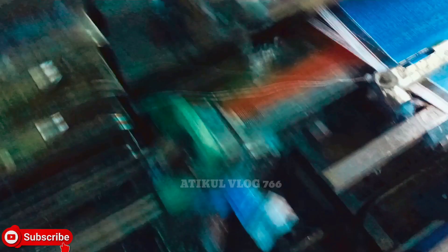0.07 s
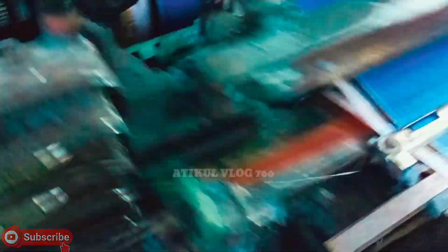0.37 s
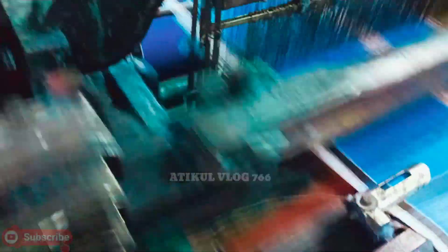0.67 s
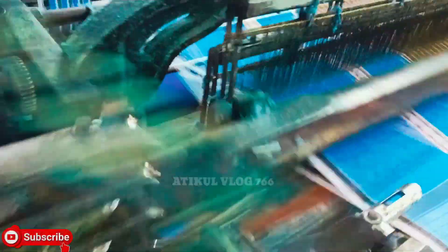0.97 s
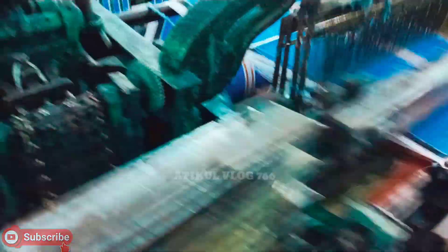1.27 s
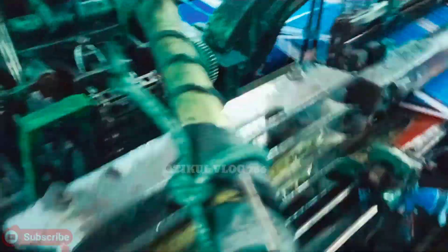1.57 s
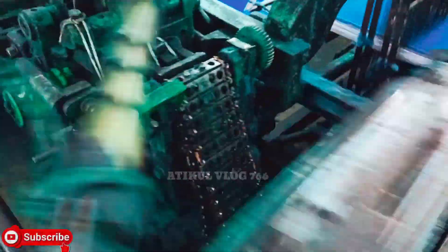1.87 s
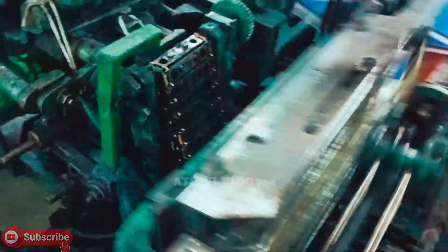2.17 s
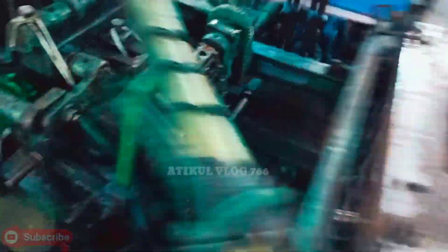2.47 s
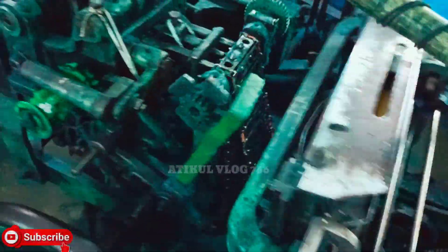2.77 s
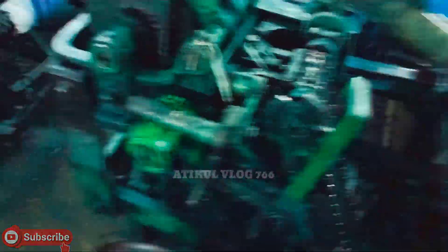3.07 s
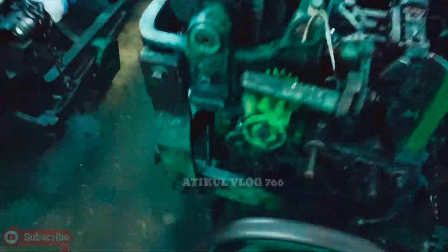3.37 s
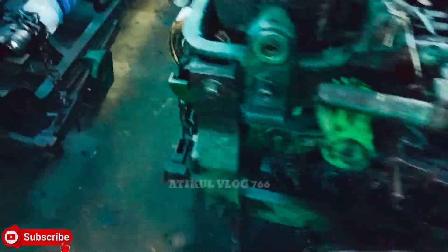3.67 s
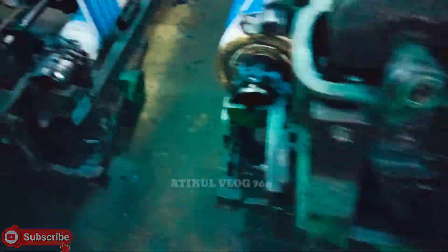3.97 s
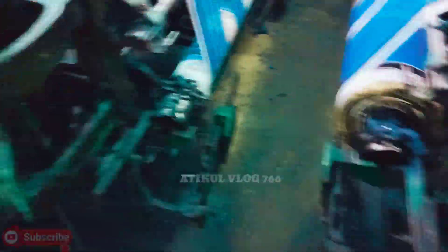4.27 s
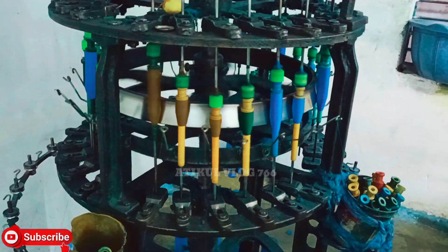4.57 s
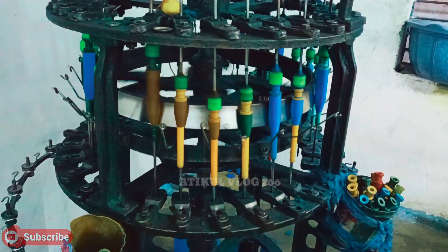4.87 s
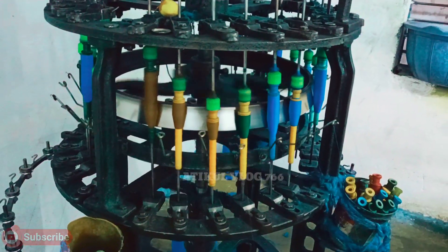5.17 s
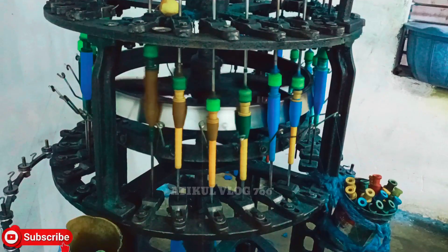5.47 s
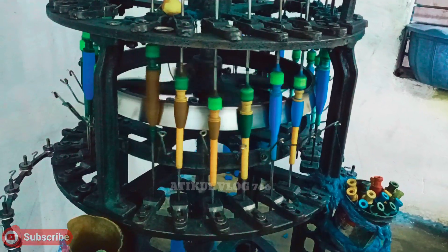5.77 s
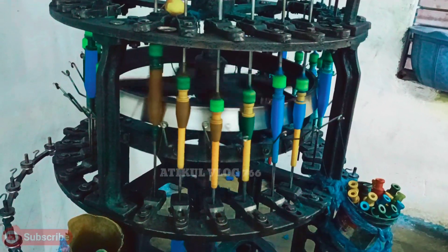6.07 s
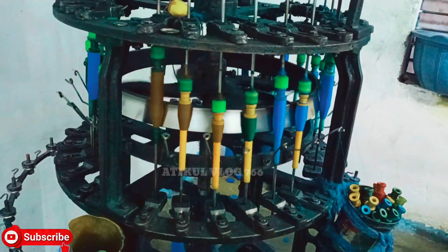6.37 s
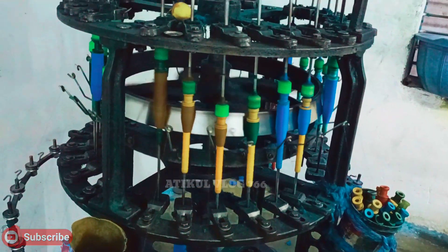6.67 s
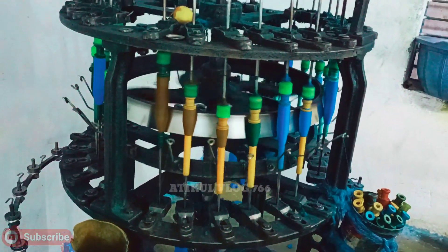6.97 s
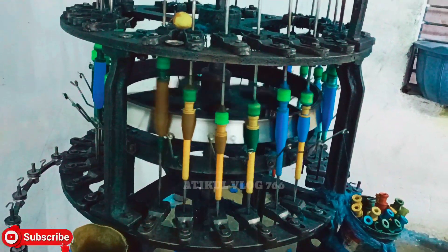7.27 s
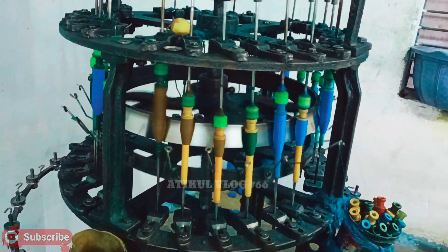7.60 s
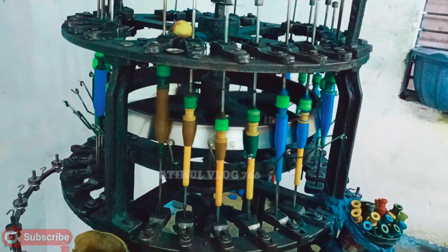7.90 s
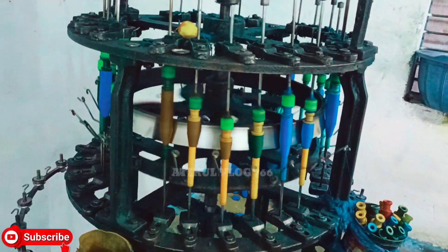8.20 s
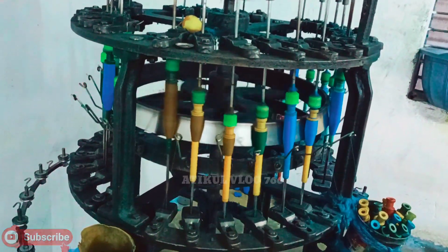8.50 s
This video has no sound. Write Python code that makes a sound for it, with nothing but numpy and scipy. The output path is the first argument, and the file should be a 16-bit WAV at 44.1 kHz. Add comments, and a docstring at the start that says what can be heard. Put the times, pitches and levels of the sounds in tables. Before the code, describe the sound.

Loud, bright loom clatter fills a workshop, heard from right beside the machines. Bursts of hard blows repeat a little under twice a second, with ringing metal, occasional thumps and droning motors beneath. Everything stops abruptly about halfway. After a short silent gap, a winding machine's spindles whir steadily close to the microphone, with fine clinking, a low drone and soft rhythmic swells of background clatter.

```python
"""Shuttle looms clack and rattle close by in a hard-walled weaving shed; after a cut to silence,
a bobbin winder whirs amid the shed's surging clatter. Picker, shuttle and reed strike one pattern
of blows out, another back; the ironwork rings, the frame thuds, motors and spindles drone.
Two small microphone ports a hand's length apart colour the treble very differently."""
import sys
import numpy as np
from scipy import signal
from scipy.fft import rfft, irfft, next_fast_len
from scipy.io import wavfile
from scipy.ndimage import uniform_filter1d, minimum_filter1d

SR = 44100
rng = np.random.default_rng(int(sys.argv[2]) if len(sys.argv) > 2 else 0)


def unload_wav(signal):
    """Save mono or channel-first audio to the path in sys.argv[1] as 16-bit WAV at rate SR, clipped to [-1, 1]."""
    wavfile.write(
        sys.argv[1],
        SR,
        np.round(np.clip(np.atleast_2d(signal).T, -1, 1) * 32767).astype(np.int16),
    )


N = 385434
TIME_S = np.arange(N) / SR

# loom ironwork modes: pitch_hz, level_db, t60_s
IRON_MODES = [(2280, -5.5, 0.18), (2460, 0, 0.13), (2645, -7.5, 0.11), (3115, -5.5, 0.13),
              (4100, -0.5, 0.11), (5200, -1, .06), (6310, 0.5, 0.058), (7000, -3, 0.13)]
# shuttle throws of the nearest loom: start_s, way (out or back), blow_db, shake_db
PICKS = [(0.0, "out", 0.5, -1), (0.571, "back", -0.5, -1.5), (1.158, "out", -3.5, 0.5),
         (1.722, "back", -1, -1), (2.319, "out", -1, -2), (2.888, "back", -7, 0.5), (3.491, "out", -4, -1)]


def amp(db):
    """Decibels to gain."""
    return 10 ** (np.asarray(db) / 20)


def unit_rms(x):
    """Scales to rms 1."""
    return x / np.sqrt(np.mean(x ** 2) + 1e-20)


def gain_at(spectrum, hz):
    """Gain from rows of freq_hz, level_db, interpolated over log frequency."""
    freq_hz, level_db = np.transpose(spectrum)
    return amp(np.interp(np.log(hz + 1), np.log(freq_hz + 1), level_db))


def filtered(x, response):
    """Filters x by a function of frequency."""
    size = next_fast_len(x.shape[-1] + 2048, True)
    return irfft(rfft(x, size) * response(np.fft.rfftfreq(size, 1 / SR)), size)[..., :x.shape[-1]]


def coloured(x, spectrum):
    """Filters x by rows of freq_hz, level_db."""
    return filtered(x, lambda hz: gain_at(spectrum, hz))


def add(mix, start_s, sound):
    """Mixes a sound in at start_s."""
    part = mix[..., max(round(start_s * SR), 0):][..., :sound.shape[-1]]
    part += sound[..., :part.shape[-1]]


def diffuse(pair, coherence=0.64, port_delay_s=0.00039):
    """Sound from all sides: the ports agree on long waves only."""
    alike = lambda hz: coherence * np.sinc(2 * hz * port_delay_s)
    mid = filtered(pair[0], lambda hz: np.sqrt((1 + alike(hz)) / 2))
    side = filtered(pair[1], lambda hz: np.sqrt((1 - alike(hz)) / 2))
    return np.array([mid + side, mid - side])


def knock_envelope(rate_hz, t60_s):
    """Loose parts knock at random, each knock dying away."""
    hits = (rng.random(N) < rate_hz / SR).astype(float)
    pole = np.exp(-2 * np.log(1000) / (t60_s * SR))
    power = signal.lfilter([1 - pole], [1, -pole], hits, zi=[hits.mean()])[0]
    return unit_rms(np.sqrt(power))


def working_levels(floor, cycles, attack_s, release_s):
    """Motions build, hold and fade over a floor. Returns rows: time_s, rattle_db, chatter_db, roar_db."""
    time_s, *floor_db = np.transpose(floor)
    t = np.arange(time_s[0], time_s[-1], 0.002)
    power = amp([np.interp(t, time_s, db) for db in floor_db]) ** 2
    for start_s, force_db, motions in cycles:
        for offset_s, length_s, *layer_db in motions:
            age_s = t - start_s - offset_s
            envelope = np.clip(age_s / attack_s, 0, 1)
            envelope *= np.exp(-np.maximum(age_s - length_s, 0) / release_s)
            power += (amp(force_db) * amp(layer_db)[:, None] * envelope) ** 2
    return np.column_stack([t, *(10 * np.log10(power))])


def machinery(levels, roar_spectrum, rattle_spectrum, knocks, roar_db, rattle_db, chatter_db):
    """Swarms of small knocks nearby, over the blurred roar of other machines."""
    # fine chatter: freq_hz, level_db
    chatter_spectrum = [(200, -23.5), (3000, -14.5), (6000, -2.5), (8500, 13.5), (16000, 15.5)]
    time_s, *layer_db = np.transpose(levels)
    rattle_gain, chatter_gain, roar_gain = (amp(np.interp(TIME_S, time_s, db)) for db in layer_db)
    far, near, fine = rng.standard_normal((3, 2, N))
    roar = amp(roar_db) * roar_gain * coloured(far, roar_spectrum) * np.sqrt(knocks)
    rattle = amp(rattle_db) * rattle_gain * coloured(near, rattle_spectrum) * knocks
    chatter = amp(chatter_db) * chatter_gain * coloured(fine, chatter_spectrum) * knocks
    return roar + rattle + chatter


def clinks(levels, modes, count, level_db, spread_db, detune, tick_db, tick_decay_s):
    """Loose parts tick and ring, louder while the machine works hard."""
    time_s, rattle_db = np.transpose(levels)[:2]
    t, out = np.arange(SR // 16) / SR, np.zeros((2, N))
    ticks = rng.standard_normal((32, 2, len(t))) * np.exp(-t / tick_decay_s) * amp(tick_db)
    for k, (when, which, size, pitch, *phase) in enumerate(rng.random((count, 6))):
        hz, db, t60_s = modes[int(which * len(modes))]
        hz *= 1 + detune * (2 * pitch - 1)
        ring = amp(db - 60 * t / t60_s) * np.sin(2 * np.pi * (hz * t + np.array(phase)[:, None]))
        start_s = time_s[0] + when * (time_s[-1] - time_s[0])
        add(out, start_s, amp(spread_db * size) * (ticks[k % len(ticks)] + ring))
    return amp(level_db + np.interp(TIME_S, time_s, rattle_db)) * unit_rms(out)


def drone(tones, rumble_db, level_db=2.5, width_hz=5.9):
    """Narrow, wavering tones of turning parts over the floor's rumble."""
    # floor rumble: freq_hz, level_db
    rumble_spectrum = [(25, -10.5), (60, -4.5), (110, -0.5), (200, -3.5), (350, -5), (1000, -13.5),
                       (4000, -52.5)]

    def response(hz):
        power = sum(amp(db + level_db) ** 2 * np.exp(-np.minimum(((hz - pitch_hz) / width_hz) ** 2, 20))
                    for pitch_hz, db in tones)
        rumble = amp(rumble_db) * gain_at(rumble_spectrum, hz)
        return np.sqrt(power * SR / (2 * np.sqrt(np.pi) * width_hz) + rumble ** 2)
    return filtered(rng.standard_normal((2, N)), response)


def loom_blows():
    """Each pick repeats its direction's blows; extra blows fall between them or make one hit harder."""
    # picker, shuttle and reed, by way: offset_s, level_db, treble_db, body_db, t60_s
    pattern = {"out": [(-0.014, -18.5, 5.5, -5.5, .08), (0.106, -11.5, 5, 0.5, 0.088),
               (0.135, -7, 2, -1.5, .06), (0.1603, -4.5, 1.5, -0.5, .09), (0.1915, -2.5, 4, -6, .08),
               (0.366, -10, 1.5, -6.5, .07), (0.3965, -4, 5.5, -0.5, .055)],
               "back": [(0.003, -12, -2, -9.5, 0.12), (0.1005, -2.5, 4, 0.5, .05),
               (0.137, -9, -2.5, -7.5, .07), (0.1677, -4.5, 11.5, 2, .065), (0.3275, -4.5, 4.5, -9, .07),
               (0.384, -8.5, -10, -1.5, .1), (0.44, -17, 6.5, 1.5, .08)]}
    # extra blows: start_s, level_db, treble_db, body_db, t60_s
    extra_blows = [(0.009, -15.5, 0.5, -10, .12), (0.3316, -4, 9.5, 3, .09), (0.4928, -15.5, 7.5, -10, .1),
                   (1.0358, -6, 5.5, -6, .057), (1.5147, -6, 3, -2.5, 0.069), (1.5293, -4.5, 8, -9, .06),
                   (1.5554, -4.5, 4, 6, .035), (2.058, -7.5, 1, -6.5, .04), (2.1565, -13.5, 10, 4, .09),
                   (2.42, -7.5, -8, -8, .08), (2.8834, -9.5, 5.5, -9.5, .1), (3.627, -2.5, 1, -6.5, .06)]
    regular = [(start_s + offset_s, blow_db + db, *timbre)
               for start_s, way, blow_db, _ in PICKS for offset_s, db, *timbre in pattern[way]]
    return regular + list(extra_blows)


def slack(depth_db, lead_s):
    """Parts fly free just before each blow: the rattle dips, most before the hardest."""
    t, dip_db = np.arange(-(SR // 12), 0) / SR, np.zeros(N)
    for start_s, db, *_ in loom_blows():
        add(dip_db, start_s + t[0], depth_db * min(amp(db), 1) * np.exp(t / lead_s))
    return amp(dip_db)


def clacks(level_db=-7, ring_db=-14, crack_db=2.5, rebound_db=-3,
           crack_decay_s=0.003, rise_s=0.00025, hold_s=0.003):
    """Each blow cracks, bounces once, sets loose parts clattering and leaves the metal ringing."""
    # steel fittings, rung only by direct blows: pitch_hz, level_db, t60_s
    steel_modes = [(9750, 0, .09), (10400, 5.5, .08), (11700, 8, .07), (14600, 8, .09)]
    t, out = np.arange(SR // 7) / SR, np.zeros((2, N))
    mode_hz, mode_db, mode_t60_s = np.transpose(IRON_MODES + steel_modes)[..., None]
    mode_decay = amp(mode_db - 60 * t / mode_t60_s)
    for start_s, db, treble_db, body_db, t60_s in loom_blows():
        spectrum = [(900, body_db), (2500, 0), (6000, 0), (9500, treble_db + 1)]
        burst = coloured(rng.standard_normal((2, len(t))), spectrum)
        rebound_age_s = t - rng.uniform(0.005, 0.016)
        rebound = amp(rebound_db) * (rebound_age_s > 0) * np.exp(-abs(rebound_age_s) / crack_decay_s)
        cracks = amp(crack_db) * (np.exp(-t / crack_decay_s) + rebound)
        clatter = amp(-60 * np.maximum(t - hold_s, 0) / t60_s)
        burst *= clatter + cracks
        # no two blows land alike
        strength, detune = rng.standard_normal((2, len(mode_hz), 1))
        pitch_hz = mode_hz * (1 + 0.033 * detune)
        ring = np.sum(strength * mode_decay * np.exp(2j * np.pi * pitch_hz * t), axis=0)
        clack = burst + amp(ring_db) * np.array([ring.real, ring.imag])
        add(out, start_s, amp(db + level_db) * (1 - np.exp(-t / rise_s)) * clack)
    return diffuse(out)


def shed_reverb(x, wet_db, t60_s, delay_s):
    """Adds a dense tail from the hard walls."""
    t = np.arange(SR * 3 // 4) / SR
    tail = coloured(rng.standard_normal((2, len(t))), [(200, 3.5), (5000, 19), (15000, 5)])
    tail *= amp(-60 * t / t60_s) * (t > delay_s)
    return x + amp(wet_db) * signal.fftconvolve(x, tail / np.linalg.norm(tail[0]), axes=1)[:, :N]


def thuds(level_db=3, low_hz=105, low_db=-4, wood_db=-3,
          ring_rise_s=0.0035, puff_rise_s=0.009, wood_rise_s=0.0028):
    """The heavy frame gives a few low cycles and a wooden knock, and pushes air at each port."""
    # frame knocks: start_s, level_db, pitch_hz, puff_db
    frame_knocks = [(0.162, -21.5, 780, -45.5), (0.332, -24, 403, -32.5), (0.391, -20, 334, -17.5),
                    (0.403, -15.5, 370, -19.5), (0.674, -16.5, 360, -28.5), (0.741, -15.5, 325, -22),
                    (1.554, -20.5, 258.6, -40), (1.823, -25.5, 342, -33), (1.893, -27, 423, -30),
                    (2.16, -22.5, 368, -24), (3.296, -24.5, 707, -42.5)]
    air_spectrum = [(50, 7), (120, -20.5), (400, -27), (2000, -71)]
    wood_spectrum = [(100, -8), (450, -0.5), (800, -1), (1300, -3.5), (2200, -15), (6000, -40.5)]
    t, out = np.arange(SR // 6) / SR, np.zeros((2, N))
    pulse = lambda rise_s: t / rise_s * np.exp(1 - t / rise_s)
    for start_s, db, pitch_hz, puff_db in frame_knocks:
        ring = np.sin(2 * np.pi * pitch_hz * t) - amp(low_db) * np.sin(2 * np.pi * low_hz * t)
        add(out, start_s, amp(db + level_db) * ring * pulse(ring_rise_s) ** 2)
        air = unit_rms(coloured(rng.standard_normal((2, len(t))), air_spectrum))
        add(out, start_s - puff_rise_s / 2, amp(puff_db) * air * pulse(puff_rise_s))
        wood = unit_rms(diffuse(coloured(rng.standard_normal((2, len(t))), wood_spectrum)))
        add(out, start_s, amp(db + wood_db) * wood * pulse(wood_rise_s))
    return out


def looms():
    """Rattling ironwork, the drive's drone and the blows of the weaving cycle."""
    # din under the strokes: time_s, rattle_db, chatter_db, roar_db
    floor = [(0.0, -20.5, -31, -31), (0.3, -20.5, -28.5, -32), (0.48, -27.5, -33.5, -37),
             (0.85, -23, -30.5, -34), (1.2, -20.5, -31.5, -30), (1.65, -22, -29, -33.5),
             (2.4, -20.5, -33.5, -30.5), (2.7, -19.5, -28, -31.5), (3.5, -20.5, -30.5, -30),
             (3.9, -21, -28, -31), (4.02, -20.5, -29, -29)]
    # ironwork shaken by each motion, by way: offset_s, length_s, rattle_db, chatter_db, roar_db
    shakes = {"out": [(-0.035, .04, -23, -24.5, -42.5), (0.11, .105, -17.5, -21.5, -28.5),
              (0.228, .03, -17.5, -27.5, -32.5), (0.314, .09, -17.5, -26.5, -33)],
              "back": [(-0.02, .12, -22, -36, -31.5), (0.076, .115, -19, -26.5, -35),
              (0.185, .054, -20.5, -28, -39), (0.362, .107, -20.5, -25, -26.5),
              (0.468, .028, -21.5, -29.5, -31.5)]}
    # far roar and near rattle: freq_hz, level_db
    roar_spectrum = [(25, 4.5), (100, 7.5), (250, 14.5), (420, 17.5), (560, 17.5), (1200, 15.5),
                     (2000, 12.5), (4000, 15), (16000, -7.5)]
    rattle_spectrum = [(200, -40.5), (1200, -7), (2000, 7), (2450, 9), (2800, 6.5), (3100, 7.5), (3600, 4),
                       (4000, 7), (4600, 4.5), (6800, 7), (7400, 2.5), (9000, -7), (16000, 6)]
    # motors and gears: pitch_hz, level_db
    drive_tones = [(112, -51), (165, -47.5), (176, -49), (470, -50), (1310, -50.5), (1428, -50)]
    # the drive swells as one passes it: time_s, gain_db
    drive_swell = [(0.0, 0), (0.8, -4.5), (1.3, 2), (1.8, -3), (2.2, -1.5), (2.5, 1.5), (3.2, -2.5),
                   (3.9, 2)]
    knocks = knock_envelope(rate_hz=400, t60_s=0.3)
    cycles = [(start_s, shake_db, shakes[way]) for start_s, way, _, shake_db in PICKS]
    levels = working_levels(floor, cycles, attack_s=0.033, release_s=0.03)
    din = machinery(levels, roar_spectrum, rattle_spectrum, knocks,
                    roar_db=-0.5, rattle_db=-0.1, chatter_db=0)
    din += clinks(levels, IRON_MODES, count=700, level_db=-7.5, spread_db=10,
                  detune=0.0685, tick_db=1, tick_decay_s=0.0012)
    din *= slack(depth_db=-4.5, lead_s=0.018)
    din += drone(drive_tones, rumble_db=-15) * amp(np.interp(TIME_S, *np.transpose(drive_swell)))
    blows = shed_reverb(clacks(), wet_db=-9.5, t60_s=0.22, delay_s=0.0082)
    return diffuse(din, coherence=0.97) + blows + thuds()


def winder(first_cycle_s=4.748, cycle_s=1.152):
    """A denser, smoother whirr of spindles with small clinks and a rough drone."""
    # steady whirr: time_s, rattle_db, chatter_db, roar_db
    floor = [(4.78, -17, -28, -24.5), (4.9, -19, -26, -23.5), (5.1, -21, -31.5, -28.5),
             (6.5, -21, -31, -27.5), (7.8, -21, -33, -29.5), (8.74, -21.5, -33, -27)]
    # clatter in the looms' rhythm, blurred: offset_s, length_s, rattle_db, chatter_db, roar_db
    swells = [(0.074, 0.13, -19.5, -26, -29.5), (0.187, 0.16, -21, -26, -27.5), (0.351, .19, -21, -27, -28),
              (0.626, .119, -20, -25, -27), (0.778, .098, -19.5, -26.5, -30),
              (0.882, .06, -22, -26.5, -30.5), (0.955, .159, -20, -24.5, -27.5)]
    # far roar and near rattle: freq_hz, level_db
    roar_spectrum = [(25, 2), (100, 2), (250, 12.5), (420, 16), (560, 16), (900, 18), (1150, 12.5),
                     (2000, 13), (4000, -4), (16000, -20)]
    rattle_spectrum = [(200, -15), (1200, 0), (1930, 2), (2100, 2.5), (2450, 7), (3350, 7), (3520, 5),
                       (4400, 7.5), (5150, 4), (5600, 4.5), (6800, 6.5), (9000, -4.5), (16000, -20)]
    # spindles and thread guides: pitch_hz, level_db, t60_s
    spindle_modes = [(1854, -5.5, 0.19), (2052, 5, 0.1), (2290, 2, .09), (2530, -3, 0.14), (3220, 4, 0.1),
                     (3350, 1.5, 0.1), (4280, 0, 0.083), (4605, 0, 0.17), (5520, -2.5, 0.11),
                     (6200, -17, .08), (6450, -1.5, 0.071)]
    # motors, gears and spindles: pitch_hz, level_db
    drive_tones = [(105, -45.5), (133, -51), (161, -42.5), (180, -46), (200, -50.5), (385, -46.5),
                   (470, -49), (768, -43), (848, -43), (920, -51), (978, -41.5), (1428, -44)]
    knocks = knock_envelope(rate_hz=2400, t60_s=0.14)
    cycles = [(start_s, 0, swells) for start_s in np.arange(first_cycle_s, TIME_S[-1], cycle_s)]
    levels = working_levels(floor, cycles, attack_s=0.081, release_s=0.058)
    din = machinery(levels, roar_spectrum, rattle_spectrum, knocks,
                    roar_db=-0.6, rattle_db=1.26, chatter_db=1.2)
    din += clinks(levels, spindle_modes, count=1400, level_db=-7, spread_db=-1,
                  detune=0.022, tick_db=8.5, tick_decay_s=0.00097)
    din += drone(drive_tones, rumble_db=-11)
    return diffuse(din, coherence=0.99)


def scene():
    """Looms, a silent gap, then the winder."""
    looms_end_s, winder_start_s = 4.024, 4.779
    return looms() * (TIME_S < looms_end_s) + winder() * (TIME_S > winder_start_s)


def record(dry):
    """Each port's resonances, a fast peak limiter, then a low-pass."""
    # port responses: freq_hz, gain_db
    left_port = [(25, -11), (60, -5), (170, -2), (260, -4.5), (500, -5), (1500, -4.5), (2700, -4.5),
                 (4800, -6), (5600, -12.5), (6550, -18.5), (7800, -7.5), (9700, -1.5), (12000, -9),
                 (13800, -22)]
    right_port = [(25, -2.5), (60, -5.5), (170, -2.5), (260, -4), (800, -4), (1600, -2), (2400, 2.5),
                  (3300, 1), (4600, -1.1), (6550, 8.5), (7600, -2.5), (9800, -18.5), (11800, -13),
                  (15200, -7.5)]
    ceiling, cutoffs_hz = 0.93, (14200, 15650)
    ports = np.array([coloured(dry[0], left_port), coloured(dry[1], right_port)])
    limiter_gain = np.minimum(ceiling / (abs(ports) + 1e-9), 1)
    ports *= uniform_filter1d(minimum_filter1d(limiter_gain, size=31), size=31)
    lowpasses = [signal.firwin(401, hz, window=("kaiser", 9), fs=SR) for hz in cutoffs_hz]
    return np.array([signal.oaconvolve(x, taps, "same") for x, taps in zip(ports, lowpasses)])


dry = scene()
out = record(dry)
unload_wav(out)
```